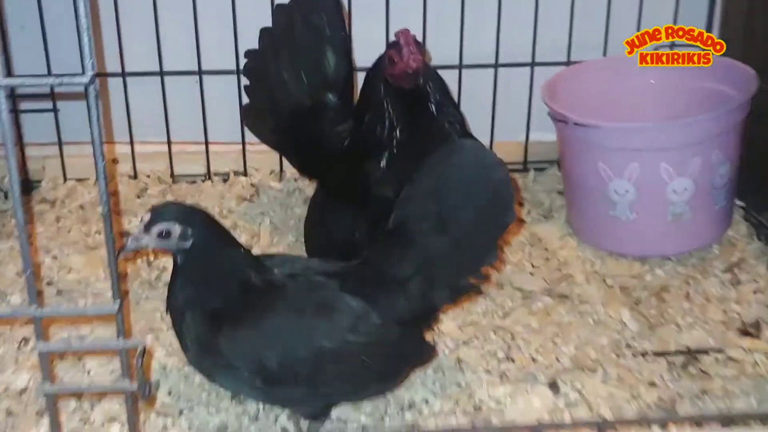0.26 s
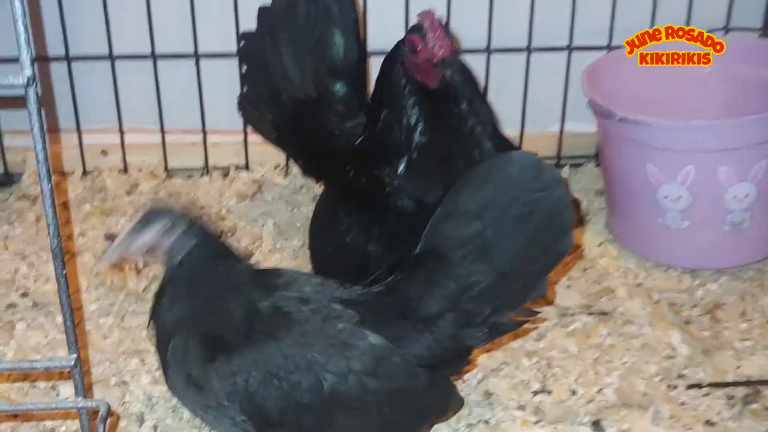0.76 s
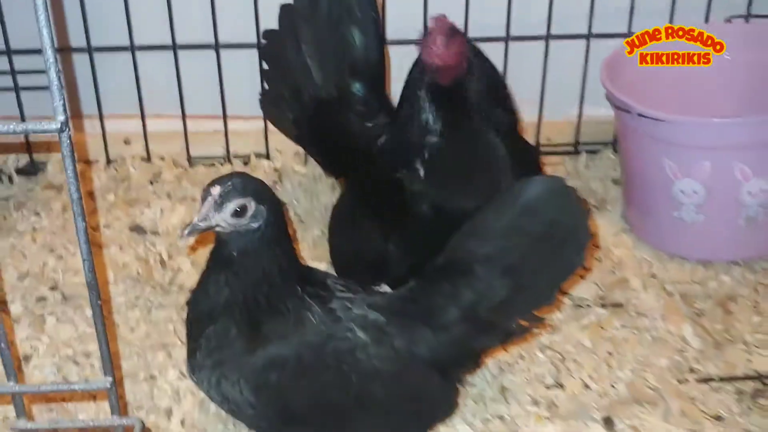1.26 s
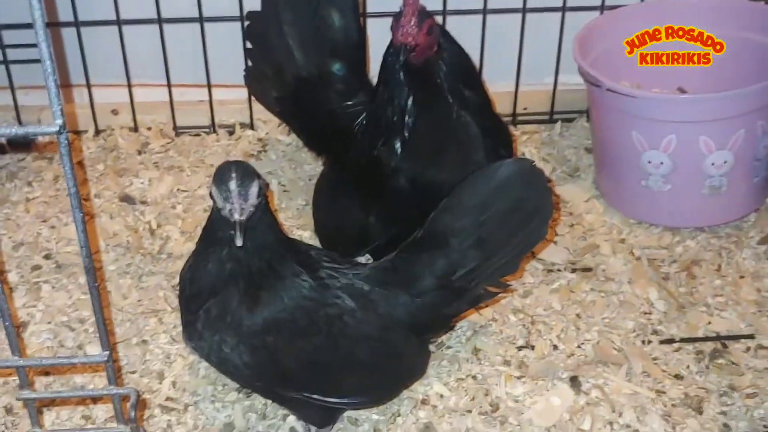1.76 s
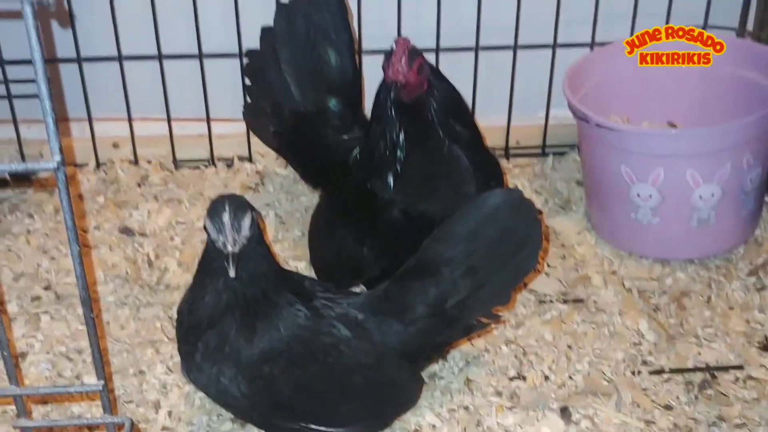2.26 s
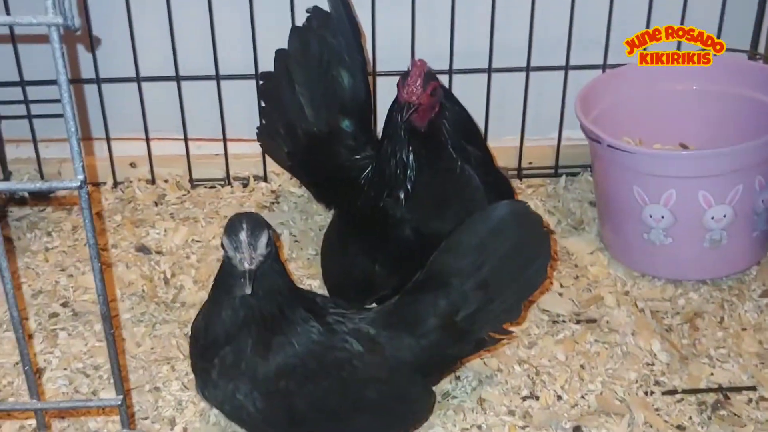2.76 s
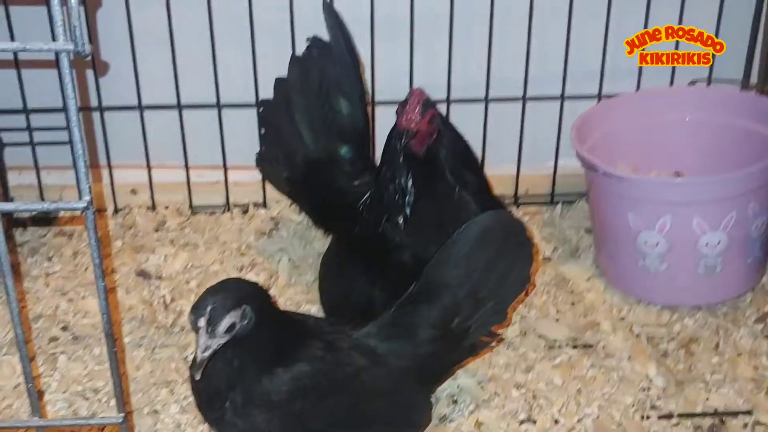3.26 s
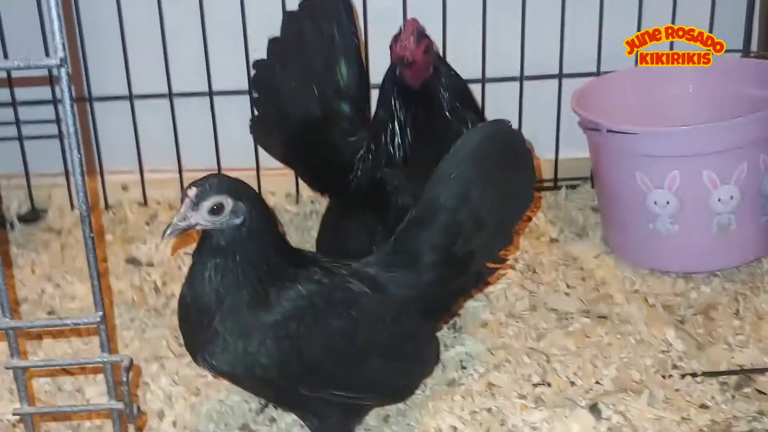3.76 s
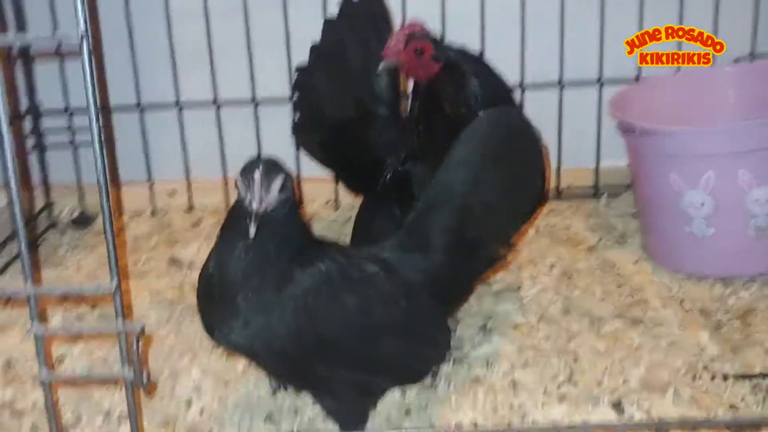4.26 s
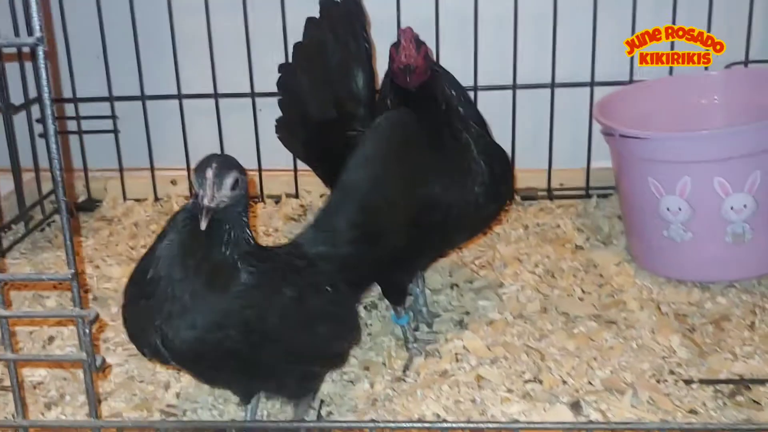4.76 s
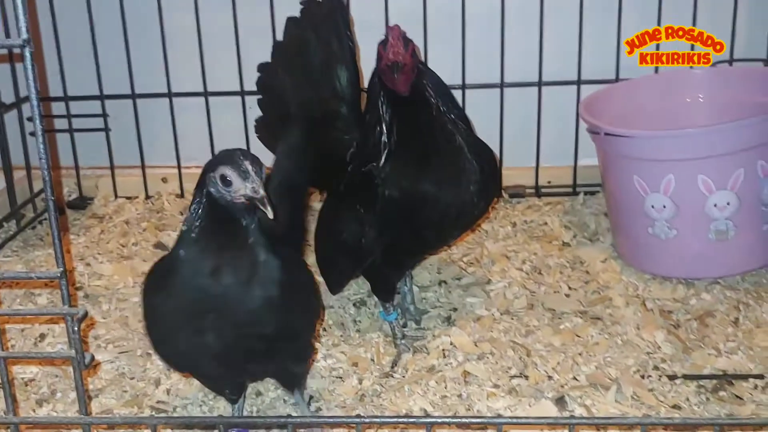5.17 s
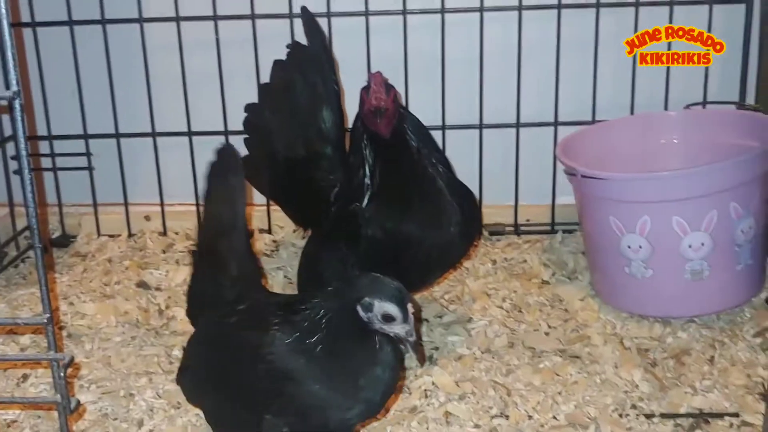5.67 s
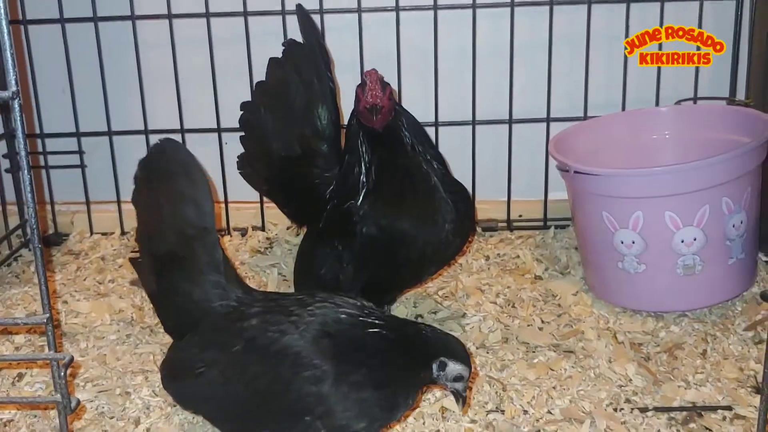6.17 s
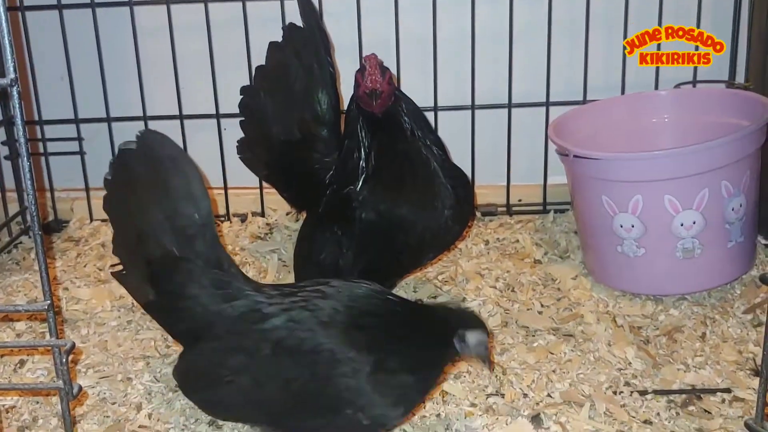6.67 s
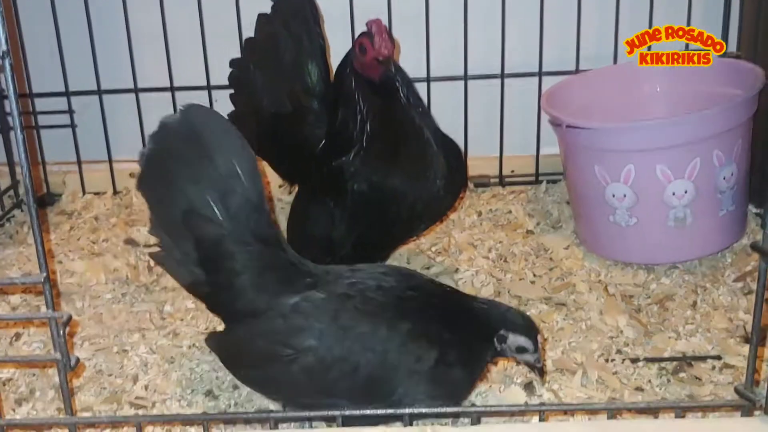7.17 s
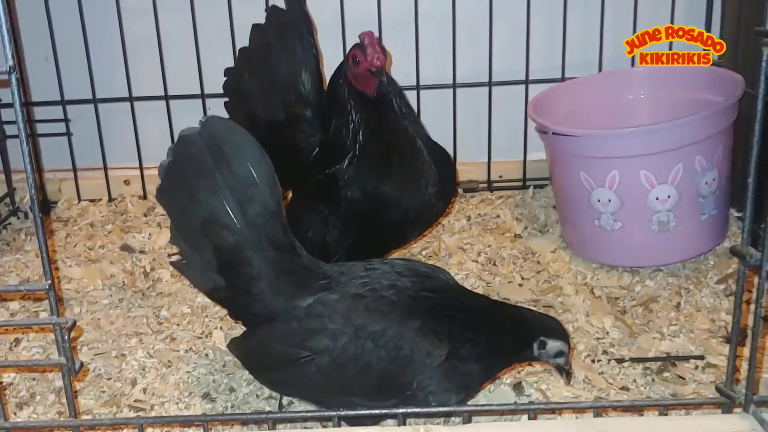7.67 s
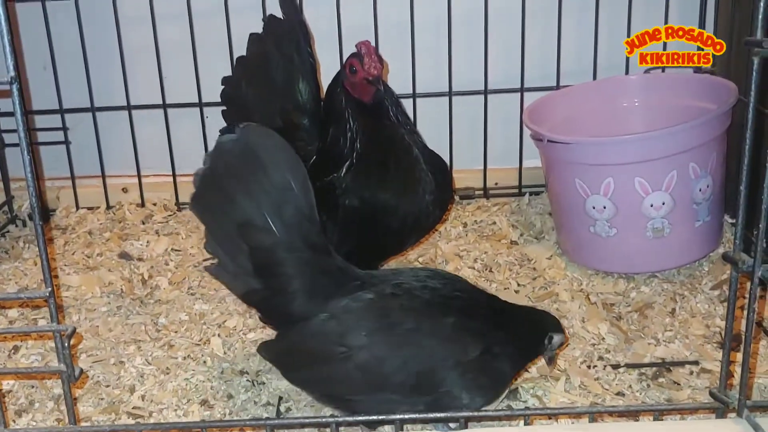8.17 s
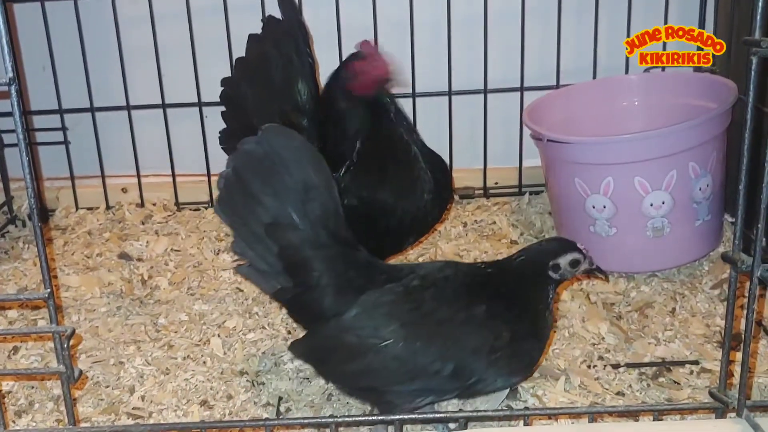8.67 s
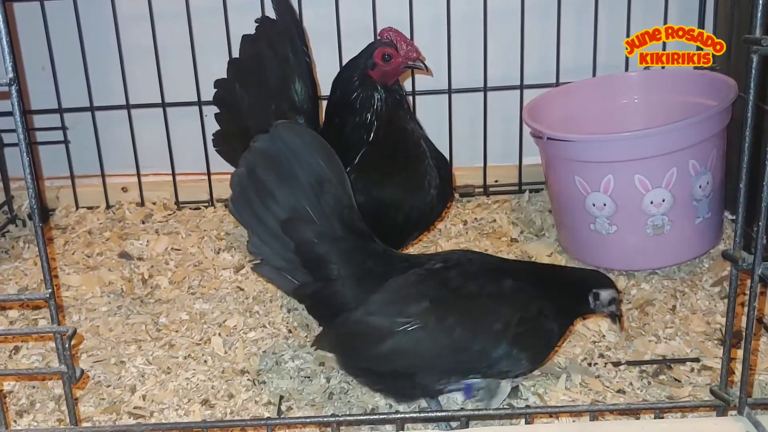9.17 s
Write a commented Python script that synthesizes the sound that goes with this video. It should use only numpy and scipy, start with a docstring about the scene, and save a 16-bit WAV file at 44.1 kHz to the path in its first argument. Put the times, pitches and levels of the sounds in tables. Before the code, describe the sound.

A small hard room with quiet mains hum, low rumble and faint hiss that slowly swell and sink. Bedding rustles softly and ticks throughout. Tiny distant squeaks come at 0.3 and 1.0 seconds; near 1.0 a close hen gives three quick low clucks, then a quavering moan rising slightly until 1.5, breaking into strained rasps to 1.9 and a weaker one until 2.1. A scuff follows at 2.3. Short cracking squeaks cluster around 2.9 to 3.3, with thin whines from 3.7 to 4.1. From 4.2 the hen stutters in quickening clucks, moans upward from 4.7, and roughens at 5.1 into a long hoarse squawk lasting until 6.4. High falling peeps overlap it and continue to 6.7, with stronger scuffs at 5.6 and 6.4. Afterwards it is quieter: faint squeaks at 7.2 to 7.9, wavering whines around 8 to 8.6, a scuff near 8.5, and last small peeps from 8.7 to 9.3.

```python
"""Bantams in a wire cage

A hen close by twice stutters into a drawn-out moan that breaks into rasps or a hoarse squawk, all built
from partials, turbulence and throat resonances. Other birds, farther off in a small hard room, squeak,
whine and peep as gliding tones. Shaped noise makes the scuffs and ticks of the bedding, a faint hiss
and a low rumble; a few sines make the mains hum."""
import sys
import numpy as np
from scipy import signal
from scipy.fft import rfft, irfft, next_fast_len
from scipy.io import wavfile
from scipy.ndimage import uniform_filter1d, map_coordinates

SR = 44100
rng = np.random.default_rng(int(sys.argv[2]) if len(sys.argv) > 2 else 0)


def log_audio(samples):
    """Write samples as a 16-bit WAV file to the path given in sys.argv[1]."""
    # one column per channel
    frames = np.atleast_2d(samples).T
    # limit to full scale, then quantise
    limited = np.clip(frames, -1, 1)
    pcm = np.round(limited * 32767).astype(np.int16)
    wavfile.write(sys.argv[1], SR, pcm)


N = 414981
TOP_HZ = 15600  # band limit of the recorder


def amp(db):
    """Decibels to a linear factor."""
    return 10 ** (np.asarray(db) / 20)


def unit(x):
    """x at rms 1."""
    return x / np.sqrt(np.mean(x ** 2) + 1e-20)


def steadied(x):
    """x at an even level of about 1, levelled by its rms over 50 ms."""
    return x / np.sqrt(np.abs(uniform_filter1d(x ** 2, SR // 20)) + 1e-9)


def along(points, hz):
    """(Hz, value) points read at hz on a log axis."""
    f, v = np.transpose(points)
    return np.interp(np.log(hz + 1), np.log(f + 1), v)


def curves(rows, t):
    """Each column after the time, read at the times t."""
    s, *cols = np.transpose(rows)
    return [np.interp(t, s, c) for c in cols]


def wobble(rate, size):
    """A smooth random curve, rate knots a second."""
    knots = rng.standard_normal(int(size * rate / SR) + 4)
    return map_coordinates(knots, [np.arange(size) * rate / SR])


def filtered(x, response):
    """x times a response of frequency."""
    n = x.shape[-1]
    m = next_fast_len(n + 4096)
    return irfft(rfft(x, m) * response(np.fft.rfftfreq(m, 1 / SR)), m)[..., :n]


def coloured(x, spectrum):
    """x shaped by a (Hz, dB) spectrum, at rms 1."""
    return unit(filtered(x, lambda hz: amp(along(spectrum, hz))))


def bell(hz, centre_hz, width_hz):
    """A resonance hump of height 1."""
    return 1 / (1 + ((hz - centre_hz) / width_hz) ** 2)


def ticks(length):
    """Sample times over a length in seconds, 5 ms at least."""
    return np.arange(int(max(length, .005) * SR)) / SR


def span(rows):
    """The sample times that a curve covers."""
    return rows[0][0] + ticks(rows[-1][0] - rows[0][0])


def gate(t, rise, fall):
    """Soft opening and closing over the times t."""
    nearest_end = np.minimum((t - t[0]) / rise, (t[-1] - t) / fall)
    return np.sin(np.pi / 2 * np.clip(nearest_end, 0, 1)) ** 2


def add(track, s, x):
    """Mix x into the track from s seconds on."""
    i = max(round(s * SR), 0)
    track[i:i + len(x)] += x[:max(N - i, 0)]


# Mains hum. Each row: frequency in Hz, relative level in dB.
MAINS_PARTIALS = [(60, 0), (120, -5.5), (180, -11)]
# Colour of the hiss. Each row: frequency in Hz, level in dB.
HISS_COLOUR = [(60, -14.5), (3300, -18.5), (5300, -23.5), (7100, -19), (7900, -32), (8400, -51.5),
               (12000, -36), (15500, -51)]
# Slow swell of hum and rumble. Each row: time in seconds, level in dB before HUM_DB is added.
HUM_SWELL = [(0.0, -61.5), (1.5, -59.5), (1.91, -70.5), (2.59, -70.5), (6.32, -65), (6.5, -61), (7.0, -72),
             (9.01, -66.5), (9.2, -60.5)]
# Slow swell of the hiss, followed by the faint ticks. Each row: time in seconds, level in dB before an offset.
HISS_SWELL = [(0.0, -59), (1.7, -67), (1.81, -82), (3.3, -73), (4.43, -63.5), (5.61, -64.5), (5.84, -70),
              (6.5, -59), (6.97, -79.5), (7.92, -65), (8.6, -76), (8.94, -71), (9.41, -57)]
HUM_DB, HISS_DB = 4, 3  # offsets added to the two swells


def background():
    """Mains hum over a low noise rumble, and a wide hiss; both swell and sink slowly."""
    t = np.arange(N) / SR
    hum_db = curves(HUM_SWELL, t)[0] + HUM_DB
    hiss_db = curves(HISS_SWELL, t)[0] + HISS_DB
    hum = unit(sum(amp(db) * np.sin(2 * np.pi * (hz * t + rng.random())) for hz, db in MAINS_PARTIALS))
    rumble = coloured(rng.standard_normal((2, N)), [(20, -18.0), (55, -7.0), (1500, -34), (6000, -101)])
    shared = 0.29 * rng.standard_normal(N)  # the part of the hiss common to both sides
    hiss = coloured(rng.standard_normal((2, N)) + shared, HISS_COLOUR)
    # both beds lean to the right
    low_bed = amp(hum_db) * (hum + amp(-0.5) * rumble) * amp([[-1.5], [1.5]])
    return low_bed + amp(hiss_db) * hiss * amp([[-1], [1]])


# Scuffs in the bedding. Each row: start in seconds, length in seconds, level in dB.
SCUFF_CUES = [(0.082, 0.023, -45.5), (0.513, 0.14, -56), (2.263, 0.17, -46.5), (2.883, 0.071, -58.5),
              (3.498, 0.17, -52), (4.249, 0.048, -48.5), (5.55, 0.075, -37.5), (6.348, 0.14, -40.5),
              (6.426, 0.085, -40), (7.441, 0.075, -50.5), (7.758, 0.13, -48), (8.395, 0.14, -53.5),
              (8.483, 0.11, -46)]
# Colour of the brushed bedding. Each row: frequency in Hz, level in dB.
BEDDING_COLOUR = [(40, -23), (85, 4.5), (170, -7), (1100, -1), (3000, -1), (5300, -17), (7200, -6),
                  (8400, -35), (12000, -28), (15500, -54.5)]
SCUFF_PEAK = 0.34  # share of the length at which a scuff is strongest
SCUFF_LUMPS_DB = 3  # unevenness of a scuff


def scuffs():
    """Feet and feathers brush the shavings: a noise puff swells and trails off, low and high clumping apart."""
    out = np.zeros(N)
    low = lambda hz: bell(hz, 0, width_hz=1460)
    high = lambda hz: np.sqrt(1 - low(hz) ** 2)
    for s, length, db in SCUFF_CUES:
        t = ticks(2 * length)  # room for the tail

        def grains():
            lumps = wobble(417, len(t)) + wobble(64, len(t)) / 2
            return rng.standard_normal(len(t)) * amp(SCUFF_LUMPS_DB * lumps)

        brush = filtered(grains(), low) + filtered(grains(), high)
        age = t / (SCUFF_PEAK * length)
        add(out, s, amp(db) * coloured(brush, BEDDING_COLOUR) * (age * np.exp(1 - age)) ** 2)
    return out


# Placed ticks of claws and shavings. Each row: start in seconds, level in dB.
PLACED_TICKS = [(4.503, -57), (5.575, -43.5), (8.502, -52)]
# Colour of every tick. Each row: frequency in Hz, level in dB.
TICK_SPECTRUM = [(5300, -22.5), (7100, 7), (8400, -41), (15500, -33)]
TICKS_PER_S, TICK_S = 6.9, 0.054  # rate of the faint ticks; decay time of every tick to 1/e
TICK_DB, TICK_SPREAD_DB = -0.5, 7.5  # faint ticks: level over the hiss swell; scatter either way


def shavings():
    """Settling shavings: bright decaying noise ticks, a few placed, faint ones random and following the hiss."""
    out, t = np.zeros(N), ticks(5 * TICK_S)
    when, size = rng.random((int(TICKS_PER_S * N / SR), 2)).T
    faint_s = when * N / SR
    faint_db = curves(HISS_SWELL, faint_s)[0] + TICK_DB + TICK_SPREAD_DB * (2 * size - 1)
    for s, db in [*PLACED_TICKS, *zip(faint_s, faint_db)]:
        tick = coloured(rng.standard_normal(len(t)), TICK_SPECTRUM) * np.exp(-t / TICK_S)
        add(out, s, amp(db) * tick)
    return out


def note(length, start_hz, end_hz, rough, overtones_db):
    """A gliding tone with chosen overtones; roughness shakes its pitch and strength."""
    t = ticks(length)
    waver = 1 + 0.0075 * wobble(87.4, len(t)) + 0.186 * rough * wobble(900, len(t))
    pitch = np.geomspace(start_hz, end_hz, len(t)) * waver
    phase = 2 * np.pi * np.cumsum(pitch) / SR
    tone = np.sin(phase) + sum(amp(db) * np.sin(k * phase) for k, db in enumerate(overtones_db, 2))
    shaken = unit(tone * (1 + 0.26 * rough * wobble(500, len(t))))
    return shaken * gate(t, 0.084 * t[-1], 0.18 * t[-1])


# Squeaks that crack at the end. Each row: start in seconds, length in seconds, pitch in Hz, level in dB,
# roughness from 0 to 1, level of the crack over the note in dB.
SQUEAK_CUES = [(0.316, 0.027, 1533, -55.5, 0.7, -23), (0.978, 0.016, 1875, -42, 0.15, -33),
               (2.896, 0.0079, 2034, -42, 0, -15), (3.046, 0.031, 1923, -44, 0, 8.5),
               (3.111, 0.028, 1906, -34.5, 0.04, -7.5), (3.239, 0.03, 1890, -43.5, 0, 7.5),
               (3.556, 0.055, 1955, -52.5, 0.35, -10), (4.061, 0.047, 1506, -53, 0.52, -10),
               (4.584, 0.12, 1862, -46, 0.41, -5), (4.732, 0.03, 1856, -38.5, 0.57, -12),
               (7.179, 0.016, 1904, -56, 0, -10), (7.269, 0.072, 2083, -52, 0.25, 5.5),
               (7.598, 0.029, 1824, -46.5, 0.14, 3), (7.92, 0.033, 1677, -51.5, 0, -6)]
SAG, SWELL_DB = .05, 11  # share of pitch lost and level gained over a squeak
SECOND_VOICE, SECOND_VOICE_DB = 1.3, -60  # other side of the syrinx: pitch over the squeak's; loudest level
CRACK_JUMP, CRACK_RISE = 0.11, 0.053  # shares by which pitch jumps at the crack and rises during it
CRACK_S, CRACK_OVERLAP_S, CRACK_ROUGH = 0.016, 0.0049, 0.37  # length; overlap with the note; roughness


def squeaks():
    """A swelling, sagging note with a weak second voice, then a short rough crack; rough notes are brighter."""
    out = np.zeros(N)
    for s, length, hz, db, rough, crack_db in SQUEAK_CUES:
        tone = note(length, hz, hz * (1 - SAG), rough, overtones_db=[-25 + 20 * rough, -27])
        swell = amp(np.linspace(0, SWELL_DB, len(tone)))
        add(out, s, amp(db) * unit(tone * swell))
        second_hz = hz * SECOND_VOICE
        second = note(length, second_hz, second_hz * (1 - SAG), rough, overtones_db=[])
        add(out, s, min(amp(db) / 2, amp(SECOND_VOICE_DB)) * second)
        crack_hz = hz * (1 + CRACK_JUMP)
        crack = note(CRACK_S, crack_hz, crack_hz * (1 + CRACK_RISE), CRACK_ROUGH, overtones_db=[-25])
        add(out, s + length - CRACK_OVERLAP_S, amp(db + crack_db) * crack)
    return out


# Pulses leading into each moan, one list per moan. Each row: time in seconds, level in dB.
CLUCK_CUES = [
    [(0.976, -35), (1.017, -35.5), (1.046, -37.5)],
    [(4.166, -47), (4.234, -39), (4.377, -34), (4.470, -35), (4.543, -36.5), (4.577, -38.5), (4.610, -38.5),
     (4.640, -38), (4.673, -38)],
]
# Colour of those pulses, one row per moan: relative levels of partials 1 to 6 in dB.
CLUCK_COLOURS = [
    [-9, 0, -5.5, -9, -28, -31],
    [-4.5, 0, 1, -14.5, -13, -11.5],
]
CLUCK_HZ, CLUCK_SAG = 538.5, 0.071  # starting pitch; share lost over a pulse
CLUCK_SCATTER_DB = 2.5  # random scatter of each partial
GRIT, GRIT_HZ = .19, 240  # phase shake of clucks and moans in radians per partial order; its rate


def clucks():
    """The syrinx catches for about ten cycles at a time; each pulse sags in pitch and has its own colour."""
    out, t = np.zeros(N), ticks(0.019)
    pitch = np.linspace(CLUCK_HZ, CLUCK_HZ * (1 - CLUCK_SAG), len(t))
    phase = 2 * np.pi * np.cumsum(pitch) / SR
    for rows, partials_db in zip(CLUCK_CUES, CLUCK_COLOURS):
        for s, db in rows:
            pulse = np.zeros(len(t))
            for k, level in enumerate(partials_db, 1):
                strength = amp(level + CLUCK_SCATTER_DB * rng.standard_normal())
                pulse += strength * np.cos(k * phase + k * k / 2 + GRIT * k * wobble(GRIT_HZ, len(t)))
            add(out, s - .002, amp(db) * unit(pulse) * gate(t, 0.0061, 0.009))
    return out


# Slow curves of the moans, one list per moan. Each row: time in seconds, pitch in Hz, level in dB.
MOAN_CURVES = [
    [(1.075, 562, -38), (1.125, 528.5, -40.5), (1.28, 531, -40.5), (1.39, 599, -43.5), (1.535, 647, -42)],
    [(4.71, 508.6, -39), (4.93, 543, -43), (5.15, 662, -42), (5.215, 706, -46)],
]
# Voice of each moan. Each row: list of partial levels in dB, depth of the throat's hollow in dB, breath in dB.
MOAN_VOICES = [([1.5, 4.5, 0.5, -8, -24.5, -37.5], 36, -15), ([-4, -2, -9.5, -9, -18.5, -28.5], 2.3, -35.5)]
HOLLOW_HZ = 1540  # antiresonance of the throat
QUAVER, FLUTTER_DB = .022, 0.72  # share by which pitch wavers; flutter of a partial per order
STUTTER_HZ, STUTTER_S = 32.5, 0.035  # a moan starts out pulsing: rate; time constant of the merging


def moans():
    """A quavering stack of partials with a little breath; the higher a partial, the more it flutters."""
    out = np.zeros(N)
    for rows, (partials_db, hollow_db, breath_db) in zip(MOAN_CURVES, MOAN_VOICES):
        t = span(rows)
        pitch, db = curves(rows, t)
        phase = 2 * np.pi * np.cumsum(pitch * (1 + QUAVER * wobble(85, len(t)))) / SR
        voice = np.zeros(len(t))
        for k, level in enumerate(partials_db, 1):
            hollow = hollow_db * bell(k * pitch, HOLLOW_HZ, width_hz=75)
            flutter = FLUTTER_DB * k * wobble(60, len(t))
            wave = np.cos(k * phase + k * k / 2 + GRIT * k * wobble(GRIT_HZ, len(t)))
            voice += wave * amp(level - hollow + flutter)
        puffed_air = rng.standard_normal(len(t)) * (1 + np.cos(phase))
        breath = coloured(puffed_air, [(400, -9.5), (1400, 1.0), (3400, -8.5), (8000, -37.0)])
        pulsing = np.cos(np.pi * STUTTER_HZ * (t - t[0])) ** 2
        stutter = 1 - np.exp((t[0] - t) / STUTTER_S) * pulsing
        add(out, t[0], amp(db) * stutter * (unit(voice) + amp(breath_db) * breath) * gate(t, 0.005, 0.04))
    return out


HALF_PITCH_DB = -4.98  # partials halfway between, from alternating strong and weak puffs, at full roughness


def syrinx(pitch, rough):
    """One puff a cycle; roughness shakes period and partials, alternates the puffs and adds turbulent bursts."""
    n, rough = len(pitch), np.clip(rough, 0, 1)
    shake = np.sqrt(rough)
    jitter = 0.01008 * wobble(90, n) + 0.0501 * shake * wobble(300, n)
    phase = 2 * np.pi * np.cumsum(pitch * (1 + jitter)) / SR

    def partial(k):
        wave = np.cos(k * phase + k * k / 2 + 1.82 * shake * wobble(330, n))
        return wave * amp(1.73 * wobble(49.4, n))

    puffs = unit(sum(partial(k) + shake * amp(HALF_PITCH_DB) * partial(k - .5) for k in range(1, 15)))
    bursts = rng.standard_normal(n) * (1 + np.cos(phase))
    turbulence = unit(filtered(bursts, lambda hz: hz < TOP_HZ / 2))
    return np.sqrt(1 - rough) * puffs + rough * turbulence


# Two rasps that the first moan breaks into, one list each. Each row: time in seconds, level in dB,
# pitch in Hz, roughness from 0 to 1.
RASP_CURVES = [
    [(1.495, -35, 657.4, 0.1), (1.525, -40, 773, 0.18), (1.56, -37.5, 714.5, 0.46),
     (1.585, -34, 673.7, 0.1), (1.65, -34.5, 657, 0.27), (1.71, -34, 665, 0.32), (1.78, -38, 631, .02),
     (1.815, -34.5, 658, 0.31), (1.885, -43.5, 653.6, 0.44)],
    [(1.99, -41, 623, 0.23), (2.035, -46.5, 613.5, 0.09), (2.08, -41, 646, 0.28), (2.138, -42, 623, 0.23)],
]
# Throat with the beak open. Each row: frequency in Hz, level in dB.
RASP_THROAT = [(220, -39), (380, -4), (620, -5.5), (840, 4), (1350, -4.5), (1680, -6.5), (1990, 5.5),
               (2200, 0.5), (2500, -21), (2850, -7), (3150, -27), (4900, -41.5), (6200, -32), (7100, -75)]
CLOSED_DB = 9  # both resonances sink by this as the beak closes
BREAK_AFTER_S, MUFFLED_DB = 0.054, 8.5  # muffled as the voice first breaks: for how long; loss of treble


def rasps():
    """The strained syrinx slips in and out of clear pitch, muffled at first; effort opens the beak to ring."""
    out = np.zeros(N)
    closed_db = lambda hz: -CLOSED_DB * (bell(hz, 2000, width_hz=200) + bell(hz, 880, width_hz=140))
    muffle_db = lambda hz: -MUFFLED_DB * (1 + np.tanh((hz - HOLLOW_HZ) / 200)) / 2
    clear_from_s = RASP_CURVES[0][0][0] + BREAK_AFTER_S
    for rows in RASP_CURVES:
        t = span(rows)
        db, pitch, rough = curves(rows, t)
        opening = np.clip((db - db.min()) / np.ptp(db), 0, 1)  # louder means wider
        wide = coloured(syrinx(pitch, rough), RASP_THROAT)
        narrow = filtered(wide, lambda hz: amp(closed_db(hz)))
        voice = opening * wide + (1 - opening) * narrow
        muffled = filtered(voice, lambda hz: amp(muffle_db(hz)))
        cleared = np.clip((t - clear_from_s) / 0.023, 0, 1)
        mixed = steadied(cleared * voice + (1 - cleared) * muffled)
        add(out, t[0], amp(db) * mixed * gate(t, 0.01, 0.031))
    return out


# Falling peeps. Each row: start in seconds, starting pitch in Hz, ending pitch in Hz, level in dB.
PEEP_CUES = [(5.317, 3250, 2670, -47), (6.029, 2900, 2690, -51), (6.156, 3165, 2849, -46.5),
             (6.29, 3363, 3000, -49), (6.552, 3380, 2850, -45), (6.69, 3420, 2807, -47),
             (8.661, 4060, 3585, -55.5), (8.803, 4220, 3940, -57), (9.054, 3240, 2963, -52),
             (9.243, 3318, 3050, -45)]
# Thin whines. Each row: start in seconds, length in seconds, starting and ending pitch in Hz, level in dB.
WHINE_CUES = [(2.75, 0.049, 2370, 1530, -59.5), (3.672, 0.22, 2107, 2352, -53.5),
              (3.892, 0.25, 2644, 2916, -58.5), (3.872, 0.18, 1606, 1460, -57.5),
              (6.583, 0.021, 1500, 1326, -48), (7.93, 0.036, 2290, 2237, -49),
              (8.025, 0.084, 3040, 2800, -54.5), (8.05, 0.19, 1416, 1335, -54.5),
              (8.147, 0.45, 2702, 2550, -57), (8.336, 0.096, 1631, 1420, -54)]
# Level of the second partial by its own pitch. Each row: frequency in Hz, level in dB.
OCTAVE_LEVEL = [(4800, -46), (5500, -15), (6400, -6), (7100, 14), (7900, -46)]
PEEP_S, PEEP_ROUGH, WHINE_ROUGH = .058, 0.094, 0.13  # length of a peep; least roughness of each call
STRAIN_HZ, STRAIN_SPAN_HZ = 3500, 4500  # a peep grows hoarser above this pitch; rise that adds roughness 1


def peeps():
    """Falling peeps and thin, quavering whines; the octave rings where it meets the upper throat resonance."""
    out = np.zeros(N)
    calls = [(*row, WHINE_ROUGH) for row in WHINE_CUES]
    for s, start_hz, end_hz, db in PEEP_CUES:
        strain = max(start_hz - STRAIN_HZ, 0) / STRAIN_SPAN_HZ
        calls.append((s, PEEP_S, start_hz, end_hz, db, PEEP_ROUGH + strain))
    for s, length, start_hz, end_hz, db, rough in calls:
        octave_db = along(OCTAVE_LEVEL, start_hz + end_hz)  # the sum is twice the mean pitch
        add(out, s, amp(db) * note(length, start_hz, end_hz, rough, overtones_db=[octave_db]))
    return out


# The long squawk that the second moan breaks into. Each row: time in seconds, level in dB, roughness
# from 0 to 1, second resonance in Hz, its lift in dB, depth of the hollow in dB, upper edge in Hz.
SQUAWK_CURVE = [(5.125, -44, 0.32, 1500, 3, -2, 2810), (5.2, -39, 0.47, 1570, 4, 2, 3100),
                (5.32, -41, .45, 1720, -2.5, -3, 3120), (5.47, -38.5, 0.42, 2050, 12, 6.5, 3500),
                (5.8, -39, 0.33, 1980, 6.5, -6, 3980), (5.9, -38, 0.4, 2237, 20.5, 4.5, 3520),
                (6.01, -42.5, 0.33, 2140, 14, 6, 3630), (6.42, -42.5, 0.34, 2225, 6.5, 5, 3400)]
# Fixed colour of the squawking throat. Each row: frequency in Hz, level in dB.
SQUAWK_COLOUR = [(220, -29), (380, -17.5), (520, -9.5), (1450, -3.5), (2450, -11.5), (2900, -10),
                 (5400, -14), (6650, 3), (8000, -17.5)]
SQUAWK_HZ, FIRST_HZ, FIRST_LIFT_DB = 482.8, 916, 4.5  # mean pitch; first resonance and its lift
EDGE_DB = 23.5  # drop above the upper edge
SQUAWK_DRIFT, DRIFT_HZ = .06, 18  # share by which pitch and first resonance each wander; how fast
GRAIN_DB, GRAIN_HZ = 0.3, 69.2  # sputter: depth; rate


def squawk():
    """A half-voiced, chaotic syrinx; the throat's resonances, hollow and edge move with neck and beak."""
    out, t = np.zeros(N), span(SQUAWK_CURVE)
    db, rough, *_ = curves(SQUAWK_CURVE, t)
    pitch = SQUAWK_HZ * (1 + SQUAWK_DRIFT * wobble(DRIFT_HZ, len(t)))
    hz, frames, z = signal.stft(syrinx(pitch, rough), SR, nperseg=1024)
    hz = hz[:, None]
    *_, second_hz, lift_db, hollow_db, edge_hz = curves(SQUAWK_CURVE, t[0] + frames)
    drift = np.interp(frames, t - t[0], wobble(DRIFT_HZ, len(t)))
    first_hz = FIRST_HZ * (1 + SQUAWK_DRIFT * drift)
    throat_db = along(SQUAWK_COLOUR, hz) + FIRST_LIFT_DB * bell(hz, first_hz, width_hz=170)
    throat_db = throat_db + lift_db * bell(hz, second_hz, width_hz=272)
    throat_db = throat_db - hollow_db * bell(hz, HOLLOW_HZ, width_hz=550)
    throat_db = throat_db - EDGE_DB * (1 + np.tanh((hz - edge_hz) / 200)) / 2
    voice = signal.istft(z * amp(throat_db), nperseg=1024)[1][:len(t)]
    sputter = amp(GRAIN_DB * wobble(GRAIN_HZ, len(t)))
    add(out, t[0], amp(db) * steadied(voice) * sputter * gate(t, 0.028, 0.034))
    return out


# Decay of the room. Each row: frequency in Hz, time to fall by 60 dB in seconds.
ROOM_DECAY = [(2000, 0.24), (7000, 0.17)]
CAGE_T60 = .045  # seconds for the floor and walls close by to fall by 60 dB


def placed(x, lead_ms, balance, cage_db, room_db):
    """A source reaches left lead_ms before right, with a (Hz, L-R dB) shading; cage and room answer as noise."""
    sides, start = np.array([[.5], [-.5]]), SR // 500
    hz, t, z = signal.stft(rng.standard_normal((2, SR // 2)), SR, nperseg=256)
    tail = signal.istft(z * amp(-60 * t / along(ROOM_DECAY, hz)[:, None]), SR, nperseg=256)[1]
    cage_decay = amp(-60 * np.arange(tail.shape[1]) / SR / CAGE_T60)
    early = rng.standard_normal(tail.shape) * cage_decay
    answer = amp(room_db) * tail / np.linalg.norm(tail[0]) + amp(cage_db) * early / np.linalg.norm(early[0])
    answer = np.pad(answer, ((0, 0), (2 * start, 0)))  # 2 ms behind the direct sound
    impulse = signal.unit_impulse(answer.shape[1], start)
    direct = filtered(impulse, lambda hz: np.exp(2j * np.pi * hz * sides * lead_ms / 1000))
    path = filtered(direct + answer, lambda hz: amp(sides * along(balance, hz)))
    return signal.fftconvolve(x[None], path, axes=1)[:, start:start + N]


def scene():
    """The hen, the other birds and the litter, each at its place, over the background."""
    litter = placed(scuffs() + shavings(), lead_ms=0,
                    balance=[(1000, 2), (7000, -13.5), (9000, 1.0)], cage_db=0, room_db=-5.0)
    squeakers = placed(squeaks(), lead_ms=0.437,
                       balance=[(1600, -12.5), (3000, -0.5)], cage_db=-23.5, room_db=2.5)
    hen = placed(clucks() + moans() + rasps() + squawk(), lead_ms=0.0776,
                 balance=[(700, 4.0), (2600, -4.5), (7000, -15.5)], cage_db=-7.0, room_db=-7.5)
    peepers = placed(peeps(), lead_ms=0.434, balance=[(1500, -4.5)], cage_db=-7.0, room_db=2.0)
    return background() + litter + squeakers + hen + peepers


def record(dry):
    """The recorder keeps nothing above its band limit."""
    return filtered(dry, lambda hz: hz < TOP_HZ)


dry = scene()
out = record(dry)
log_audio(out)
```